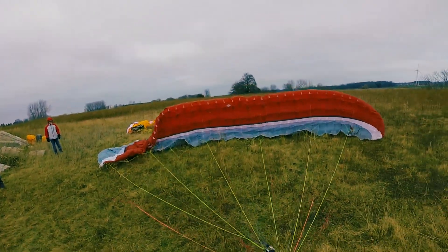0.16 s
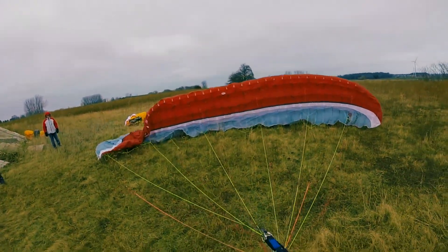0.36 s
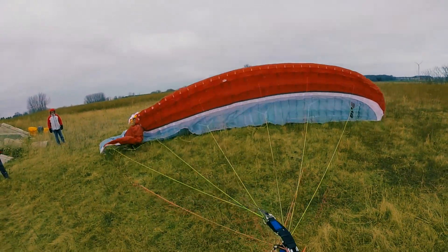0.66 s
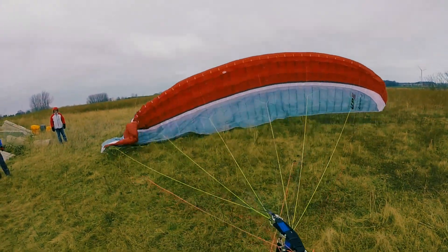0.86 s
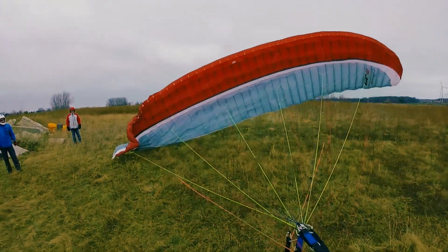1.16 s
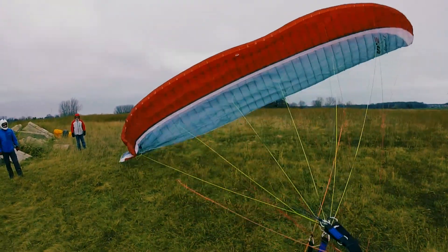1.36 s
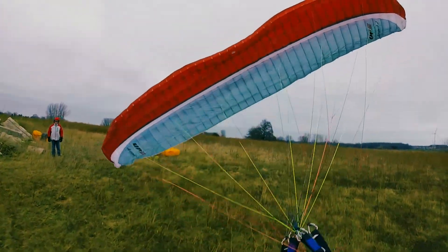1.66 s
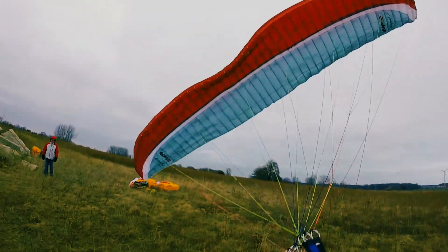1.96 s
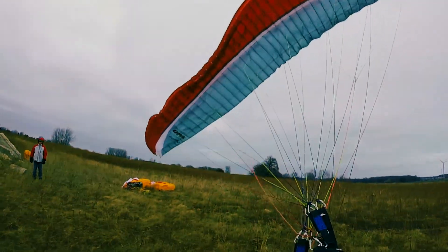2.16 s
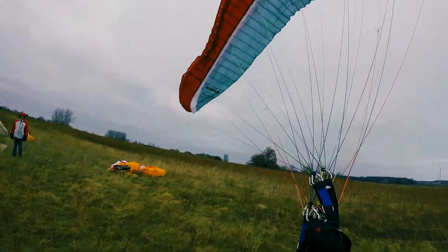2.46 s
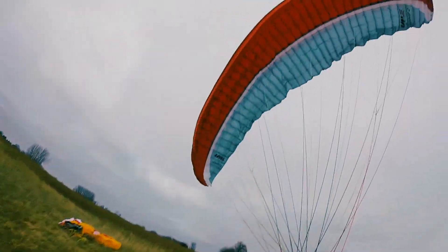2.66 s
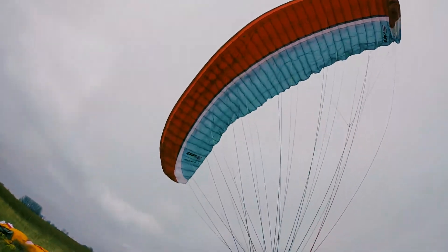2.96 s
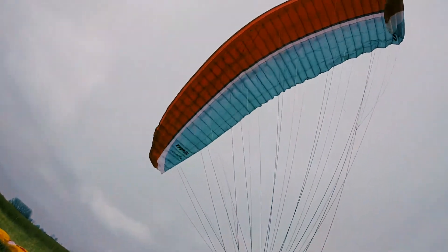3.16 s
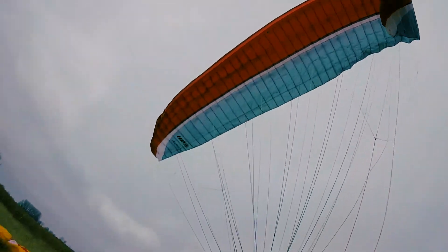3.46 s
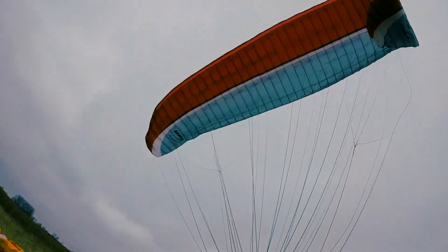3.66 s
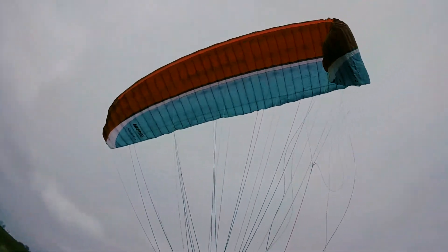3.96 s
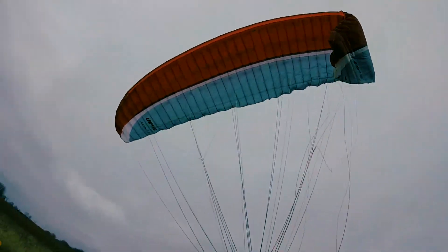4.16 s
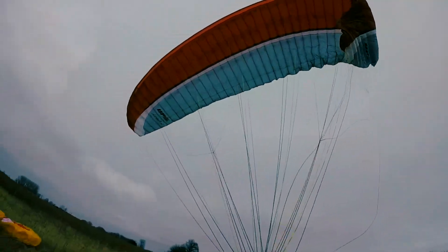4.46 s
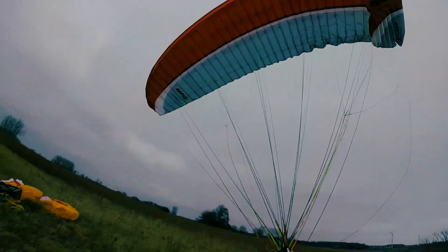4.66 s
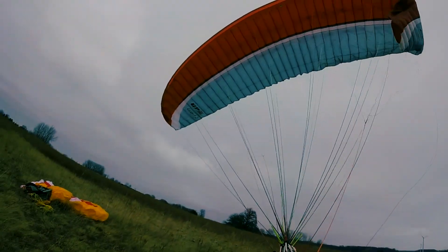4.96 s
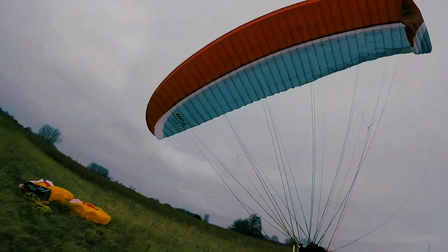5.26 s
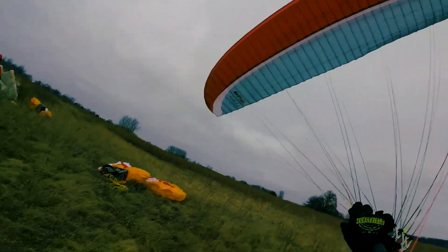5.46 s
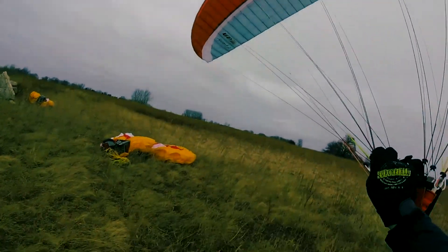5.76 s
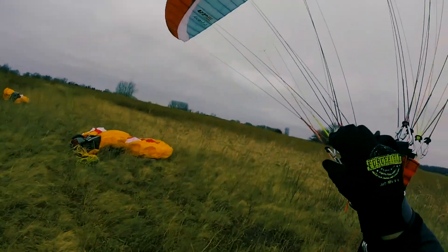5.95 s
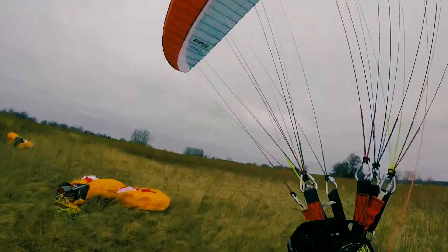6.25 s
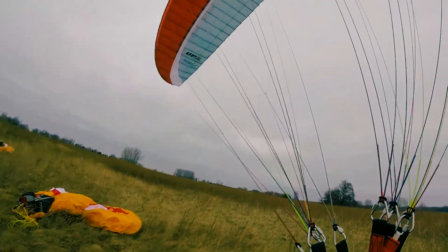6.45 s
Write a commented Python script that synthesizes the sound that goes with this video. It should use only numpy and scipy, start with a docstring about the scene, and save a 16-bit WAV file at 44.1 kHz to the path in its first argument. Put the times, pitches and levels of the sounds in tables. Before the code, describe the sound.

Gusty wind thumps on a close microphone while paraglider fabric and grass rustle softly and lines and buckles tick.

```python
"""Low wind rumble first, on a small helmet camera: a pilot on open grass, a fabric wing rising in strong wind.
Right at the microphone, eddies sway and thump the membrane, and puffs of air rush through the ports of
the housing and ring its cavities. Wing and grass rustle further off. Lines and buckles tick, thin
whistles come and go, the pressure pops once and, late on, a buckle snaps tight."""
import sys
import numpy as np
from scipy import signal
from scipy.fft import rfft, irfft, next_fast_len
from scipy.io import wavfile
from scipy.ndimage import uniform_filter1d

SR = 44100
rng = np.random.default_rng(int(sys.argv[2]) if len(sys.argv) > 2 else 0)


def bounce(signal):
    """Save signal as a 16-bit WAV file at the path given by the first command-line argument."""
    frames = np.transpose(np.atleast_2d(signal))
    limited = np.clip(frames, -1, 1)
    pcm = np.round(limited * 32767).astype(np.int16)
    wavfile.write(sys.argv[1], SR, pcm)


N = 291236
T = np.arange(N) / SR


def undb(db):
    return 10 ** (np.asarray(db) / 20)


def unit(x):
    return x / np.sqrt(np.mean(x ** 2))


def curves(table):
    """Each column after the time, drawn as straight lines between the rows."""
    times, *columns = np.transpose(table)
    return [np.interp(T, times, column) for column in columns]


def ring(x, hz, width_hz):
    """One resonance, gain 1 at the centre."""
    return signal.lfilter(*signal.iirpeak(hz, hz / width_hz, fs=SR), x)


def band(x, hz, width_hz):
    """The same resonance twice, for steeper skirts."""
    return ring(ring(x, hz, width_hz), hz, width_hz)


def flicker(spread_db, rate_hz):
    """A gain that wanders smoothly between random levels."""
    hold = int(SR / rate_hz)
    steps = np.repeat(rng.standard_normal(N // hold + 1), hold)
    smooth = uniform_filter1d(uniform_filter1d(steps, hold), hold)
    return undb(spread_db * unit(smooth[:N]))


def air(grain_db, rate_hz):
    """Turbulent air: noise in grains of uneven strength."""
    return rng.standard_normal(N) * flicker(grain_db, rate_hz)


def rush(flow, modes, flicker_db, rate_hz):
    """A flow through resonances of alternating sign, each flickering by itself; rms 1."""
    return unit(sum((-1) ** k * undb(db) * flicker(flicker_db, rate_hz) * band(flow, hz, 2.2 * width)
                    for k, (hz, width, db) in enumerate(modes)))


def coloured(points):
    """Noise with a spectrum through (f/Hz, level/dB) points; rms 1."""
    hz, db = np.transpose(points)
    size = next_fast_len(N)
    bin_hz = np.arange(1, size // 2 + 2) * SR / size
    gain = undb(np.interp(np.log(bin_hz), np.log(hz), db))
    return unit(irfft(gain * rfft(rng.standard_normal(size)), size)[:N])


CAVITY_HZ = 127.7  # the lowest cavity of the housing
# Wind pressure right on the membrane: t/s, sway level/dB, small turbulence level/dB
WIND_PRESSURE = [(0.0, -52, -53.5), (0.72, -46.5, -58), (1.08, -32.5, -50), (1.89, -35, -53),
                 (2.24, -31.5, -40), (2.32, -22, -36), (2.68, -37, -44), (2.72, -24.5, -48),
                 (3.73, -36.5, -45.5), (4.03, -34, -32.5), (4.19, -37, -41.5), (5.15, -37, -51),
                 (5.83, -30.5, -49), (5.99, -43, -56), (6.17, -24.5, -53), (6.32, -44, -50),
                 (6.38, -24.5, -46), (6.6, -39, -42.5)]


def buffeting(stirred):
    """Wind sways and thumps the membrane; the low cavity hums, louder in stirred air."""
    sway_db, turbulence_db = curves(WIND_PRESSURE)
    sway = unit(band(rng.standard_normal(N), hz=12.4, width_hz=8.7)) * undb(sway_db)
    turbulence = unit(band(rng.standard_normal(N), hz=41, width_hz=42)) * undb(turbulence_db)
    turbulence *= flicker(1.7, 8.6)
    hum = unit(band(rng.standard_normal(N), CAVITY_HZ, width_hz=38)) * flicker(3.5, 20)
    hum *= np.hypot(undb(-58.5), undb(-40) * stirred ** 0.39)  # calm floor and driven part
    rumble = sway + turbulence + eddies() + hum
    # the cavity passes little above its own pitch
    rumble = signal.sosfiltfilt(signal.butter(3, 200, fs=SR, output="sos"), rumble)
    return signal.sosfilt(signal.butter(2, 7, "high", fs=SR, output="sos"), rumble)


# Wing and grass some way off, between the puffs: t/s, middle level/dB, treble level/dB
RUSTLE_LEVELS = [(0, -56, -61.5), (.51, -59, -61), (.8, -57, -54), (1, -55, -57), (1.8, -51.5, -58),
                 (2.28, -53.5, -59.5), (2.7, -49, -60), (3.05, -56.5, -63.5), (3.6, -50, -70.5),
                 (4, -52, -62), (4.3, -42, -60.5), (4.82, -54, -66), (5.2, -53, -61), (5.6, -41.5, -51),
                 (5.79, -63, -70), (6.05, -58.5, -66.5), (6.25, -51, -64.5), (6.6, -52.5, -65)]
# Spectrum of the low rustle: f/Hz, relative level/dB
LOW_SPECTRUM = [(110, -74), (180, 1.5), (236, -1), (396, -6.5), (628, -6), (1100, -11), (1430, -60),
                (2420, -120)]
# Middle, treble and highest hiss, heard through the housing: f/Hz, nominal width/Hz, relative level/dB
MIDDLE_BANDS = [(1260, 174, 5), (1723, 134, 8), (1910, 123, 5), (2436, 556, 3.5), (3303, 255, 0)]
TREBLE_BANDS = [(3784, 1320, 1), (4870, 430, 0), (5560, 240, -1), (6520, 316, -3.5)]
HIGHEST_BANDS = [(7280, 860, 1), (9700, 3500, -8.5), (12900, 2900, -11)]


def rustle(stirred):
    """Distant cloth and grass: smooth hiss, coloured by the housing, louder while the air is stirred."""
    middle_db, treble_db = curves(RUSTLE_LEVELS)
    # low, middle, treble, highest
    calm = undb([-44.5 + 0.28 * middle_db, middle_db, treble_db, -34 + 0.62 * treble_db])
    driven = undb([-59.5, -53, -63, -76])[:, None] * stirred ** 0.34
    low_gain, *hiss_gains = np.hypot(calm, driven)
    flow = air(grain_db=1.2, rate_hz=400)
    hiss = sum(gain * rush(flow, modes, flicker_db=1.1, rate_hz=14)
               for gain, modes in zip(hiss_gains, (MIDDLE_BANDS, TREBLE_BANDS, HIGHEST_BANDS)))
    return hiss + low_gain * flicker(2.5, 8.5) * coloured(LOW_SPECTRUM)


USUAL_EDDY_DB, USUAL_EDDY_MS = -22, 4.5
# Single eddies on the membrane: t/s, peak level before filtering/dB, push 1 or suck -1, width/ms
EDDIES = [(0.026, -37, -1, 6.2), (0.226, -37, -1, 8.2), (1.081, -22.5, -1, 5.7), (1.126, -27.5, 1, 15),
          (1.305, -37, 1, 3.8), (1.596, -25, -1, 6.9), (1.878, -33, 1, 4.3), (1.922, -21.5, -1, 16),
          (1.982, -25, 1, 6), (2.021, -19.5, -1, 3.8), (2.171, -32.5, -1, 1.4), (2.208, -18.5, -1, 3.2),
          (2.243, -14, -1, 9.3), (2.293, -20.5, 1, 6.6), (2.329, -25, -1, 7.1), (2.396, -18, 1, 5.8),
          (2.452, -21, -1, 4.3), (2.499, -10.5, -1, 6.2), (2.571, -29, -1, 5.5), (2.627, -42, 1, 3),
          (2.661, -21.5, -1, 3.7), (2.736, -16, -1, 3.9), (2.786, -15.5, 1, 7.5), (2.828, -16.5, -1, 3.4),
          (2.867, -33, -1, 2.9), (3.023, -11, 1, 4.1), (3.082, -17, 1, 14), (3.289, -26.5, -1, 2.3),
          (3.321, -22.5, 1, 8.1), (3.43, -21, -1, 6), (3.473, -24, -1, 2), (3.51, -22, 1, 1.7),
          (3.547, -23, 1, 3.5), (3.667, -30, 1, 1.14), (3.799, -22.5, 1, 9.6), (3.813, -22, -1, 16),
          (3.933, -21, 1, 4.4), (3.995, -20, -1, 6), (4.0705, -6, 1, 3.5), (4.0755, -3.5, -1, 5),
          (4.135, -30, 1, 4.1), (4.189, -23.5, -1, 3.9), (4.239, -19.5, 1, 2.7), (4.278, -31.5, -1, 1.8),
          (4.325, -30, -1, 3.4), (4.362, -19, 1, 1.7), (4.391, -15, 1, 4.6), (4.437, -17, 1, 2.8),
          (4.447, -13.5, -1, 2.7), (4.516, -21.5, -1, 2.4), (4.581, -34, 1, 2.2), (5.425, -24, 1, 2.5),
          (5.737, -18.5, -1, 23), (5.792, -18.5, -1, 14), (5.818, -21, -1, 3.8), (6.158, -9.5, -1, 6.2),
          (6.168, -15.5, -1, 5.5), (6.196, -16.5, -1, 2.9), (6.232, -16.5, 1, 4.5), (6.33, -30.5, 1, 3),
          (6.379, -16.5, -1, 8.3), (6.414, -24.5, -1, 3.3)]


def eddies():
    """Each eddy is a bell-shaped pulse of pressure that also kicks the low cavity into ringing."""
    pulses, kicks = np.zeros((2, N))
    for start, db, sign, ms in EDDIES:
        # the ringing is weaker after wide eddies and grows slower than their peak
        kick_db = db - 4.5 - 6 * np.log2(ms / USUAL_EDDY_MS) - 0.31 * (db - USUAL_EDDY_DB)
        near = slice(max(int((start - .04) * SR), 0), int((start + .04) * SR))
        age_ms = 1000 * (T[near] - start)
        pulses[near] += sign * undb(db) * np.exp(-(age_ms / (0.61 * ms)) ** 2)
        kicks[near] += sign * undb(kick_db) * np.exp(-(age_ms / 1.9) ** 2)
    return pulses + undb(12.5) * ring(kicks, CAVITY_HZ, width_hz=11.1)


USUAL_PUFF_DB, USUAL_TREBLE_DB = -45, -61
PUFF_RISE_MS, PUFF_FALL_MS, PUFF_DOME_DB = 3.2, 4.4, 5
# Air through the ports, next to the microphone:
# t/s, length/ms, level/dB, hollow cavities re level/dB, upper cavities re level/dB
PORT_PUFFS = [(0.19, 38, -65, 4.5, 3), (1.692, 57, -69, -11, 6), (1.86, 124, -51.5, -9, 0),
              (1.99, 36, -46.5, -6.5, 1), (2.142, 61.5, -40.5, -7, 4.5), (2.209, 64, -45, -6.5, -5.5),
              (2.275, 38, -51, -1.5, -6), (2.358, 27, -43, -8.5, -1), (2.436, 81, -50, -1, -3),
              (2.557, 68, -50.5, -2, 6), (2.648, 27, -44.5, -6, -5), (2.682, 44, -41, -5.5, 4),
              (2.77, 84, -40, -7.5, 0.5), (2.852, 27, -50.5, -9, 3), (2.966, 23, -40, -12, -8),
              (2.991, 32, -36.5, -10, 2.5), (3.031, 31, -39.5, -7.5, 2.5), (3.228, 54, -39.5, -11.5, -2),
              (3.286, 25, -37, -14, 4.5), (3.384, 42, -47, -4, 4), (3.445, 24, -38.5, -0.5, -13),
              (3.475, 38, -37.5, -5, -6.5), (3.498, 57, -30.5, -7.5, -6.5), (3.572, 36, -40, -19, -3),
              (3.598, 91, -34, -10, 0), (3.717, 47, -43, -9.5, -1.5), (3.873, 72, -49.5, -5, 2),
              (4.068, 19, -32, -7, -4), (4.097, 44.7, -27, 4, -5.5), (4.14, 47, -34.5, -5.5, -9),
              (4.229, 29, -35, -1, -8.5), (4.254, 96, -32, -5, -9), (4.345, 52, -40.5, 0, -18),
              (4.405, 47, -32, 2, -8), (4.516, 32.7, -28.5, -2, -6.5), (4.605, 63, -48.5, -8, -5),
              (4.695, 97, -46, -13.5, -9), (5.039, 95, -52.5, -18, -17), (5.22, 67, -48, -8, 0.5),
              (5.311, 53, -43.5, -7, -2), (5.398, 72, -42, -6, -1.5), (5.49, 75, -47.5, -6, -1),
              (5.555, 65, -41, -16, -1.5), (5.607, 47, -36, -13, 0), (5.75, 68, -47.5, -9, 1),
              (5.842, 24, -51, -16, -20), (5.992, 81, -53, -5, -4), (6.164, 21, -42.5, -5, 3.5),
              (6.199, 23, -42, -4.5, 5), (6.282, 21, -46, -10, -2), (6.322, 7.2, -53, 7, -12),
              (6.337, 85, -45, -6.5, -3), (6.533, 61, -45.5, -8, -1.5)]


def puff_power():
    """Puffs open and shut quickly; gives the power in six groups of cavities, then in the bare flow."""
    power = np.zeros((7, N))
    _, treble_db = curves(RUSTLE_LEVELS)
    for start, ms, db, hollow_db, upper_db in PORT_PUFFS:
        near = slice(max(int((start - .06) * SR), 0), int((start + ms / 1000 + .1) * SR))
        age_ms = 1000 * (T[near] - start)
        gate = 1 / (1 + np.exp(-age_ms / PUFF_RISE_MS)) / (1 + np.exp((age_ms - ms) / PUFF_FALL_MS))
        dome = undb(-PUFF_DOME_DB * np.clip(2 * age_ms / ms - 1, -1, 1) ** 2)  # weaker at both ends
        # hollow puffs favour the low groups; thud and brightness grow slower than the puff
        strength_db = db - USUAL_PUFF_DB
        thud_db = -12.5 + 0.45 * hollow_db - 0.19 * strength_db
        throat_db = -1.5 + 0.2 * hollow_db
        body_db = -5.5 - 0.2 * hollow_db
        bright_db = -11 + 0.75 * upper_db - 0.22 * strength_db
        bright_db += 0.47 * (treble_db[int(start * SR)] - USUAL_TREBLE_DB)
        mix_db = np.array([thud_db, throat_db, body_db, hollow_db, upper_db, bright_db, 0])
        power[:, near] += gate * (dome * undb(db + mix_db[:, None])) ** 2
    return power


def stirring(power, linger_ms):
    """Air stays stirred after a puff: size of the recent flow relative to a usual puff."""
    decay = np.exp(-1000 / (linger_ms * SR))
    return np.sqrt(signal.lfilter([1 - decay], [1, -decay], power)) / undb(USUAL_PUFF_DB)


# Cavities around the microphone that the puffs ring, in six groups:
# f/Hz, nominal width/Hz, relative level/dB
THUD_MODES = [(242, 7.1, 16), (282, 69, -18), (466, 140, -18)]
THROAT_MODES = [(1168, 56, -1), (1280, 73, 0.5), (1414, 67, -2.5)]
BODY_MODES = [(1527, 57, 2.7), (1605, 113, 17.3), (1910, 67, 10.5)]
HOLLOW_MODES = [(540, 60, -11.5), (678.7, 31, 2.5), (723, 41, -5), (813, 47, -5.5), (997, 123, -2),
                (1078, 230, -5.5)]
UPPER_MODES = [(2134, 190, 0), (2432, 81, 5), (2548, 42, -0.5), (2715, 71, 5.5), (2955, 64, 5.5),
               (3240, 190, -0.5)]
BRIGHT_MODES = [(4170, 500, 10), (4830, 760, 8), (5720, 340, 10), (6570, 280, 3.5), (7700, 1900, -21),
                (10000, 1400, -8), (12200, 2000, -30.5)]


def puffs(cavity_power):
    """One flow through the ports excites all the cavities, each puff in a mix of its own."""
    flow = air(grain_db=2.06, rate_hz=500)
    groups = (THUD_MODES, THROAT_MODES, BODY_MODES, HOLLOW_MODES, UPPER_MODES, BRIGHT_MODES)
    voices = [rush(flow, modes, flicker_db=1.5, rate_hz=30) for modes in groups]
    return np.sum(np.sqrt(cavity_power) * voices, axis=0) * flicker(0.8, 60)


def burst(start, peak_db, hz, decay_ms, relative_width):
    """A short rattle of noise around one pitch."""
    age = np.arange(int(.012 * SR)) / SR
    impact = rng.standard_normal(len(age)) * np.exp(-1000 * age / decay_ms)
    grit = band(impact, hz, relative_width * hz)
    first = int(start * SR)
    out = np.zeros(N)
    out[first:first + len(age)] = undb(peak_db) * grit / np.abs(grit).max()
    return out


# Lines and buckles, heard from the helmet: t/s, peak level/dB, f/Hz
LINE_TICKS = [(2.23, -47, 8000), (2.4443, -53, 8500), (2.4598, -49, 8500), (2.4674, -55, 9000),
              (2.4867, -47, 8000), (2.4944, -54, 13000), (2.9901, -48, 7670), (3.266, -51, 7000),
              (3.8, -47, 7000), (4.151, -47, 9000), (4.6444, -51, 6900), (4.8182, -45.5, 9000),
              (4.822, -38.5, 5030), (5.031, -46, 8300), (5.042, -39.5, 4200), (5.6067, -43.5, 10000),
              (5.623, -43, 9900), (5.6245, -35, 5900), (6.1836, -31.5, 4770), (6.185, -40, 2900),
              (6.201, -31, 2530), (6.2414, -51, 8000), (6.326, -34, 2170)]


def ticks():
    """Lines and buckles tick, each a tiny burst of bright noise."""
    return sum(burst(start, db, hz, decay_ms=2.3, relative_width=0.51) for start, db, hz in LINE_TICKS)


# Faint whistles: centre t/s, half length/ms, level/dB, f/Hz, width/Hz
WHISTLES = [(2.24, 25, -63, 6650, 600), (4.69, 28, -64, 6600, 500), (5.63, 45, -63, 10150, 500)]


def whistles():
    """Narrow hisses that swell and fade, perhaps lines sliding through links."""
    noise = rng.standard_normal(N)
    return sum(undb(db) * unit(band(noise, hz, width)) * np.exp(-(1000 * (T - centre) / ms) ** 2)
               for centre, ms, db, hz, width in WHISTLES)


def pressure_pop(at_s=3.0602, below_db=-15.5, sink_ms=9.0, above_db=-20, relax_ms=22):
    """The pressure at the microphone sinks, jumps at once and relaxes."""
    gap_ms = 1000 * np.abs(T - at_s)
    sinking = -undb(below_db) * np.exp(-gap_ms / sink_ms)
    relaxing = undb(above_db) * np.exp(-gap_ms / relax_ms)
    return np.where(T < at_s, sinking, relaxing)


def buckle_snap():
    """A buckle snaps tight: one crack, shorter and louder than the ticks."""
    return burst(start=5.624, peak_db=-20, hz=3000, decay_ms=0.73, relative_width=0.45)


def scene():
    """Mono, from the helmet: the puffs ring the housing and also swell the hum and the rustle."""
    *cavity_power, flow_power = puff_power()
    hollow_power = cavity_power[3]
    wind = buffeting(stirring(hollow_power, linger_ms=29)) + puffs(cavity_power)
    wing_and_grass = rustle(stirring(flow_power, linger_ms=63))
    clicks = ticks() + pressure_pop() + buckle_snap()
    return (wind + wing_and_grass + clicks + whistles())[None]


def record(dry):
    """The camera cuts the top steeply above 15.5 kHz."""
    return signal.sosfilt(signal.butter(14, 15500, fs=SR, output="sos"), dry)


dry = scene()
out = record(dry)
bounce(out)
```